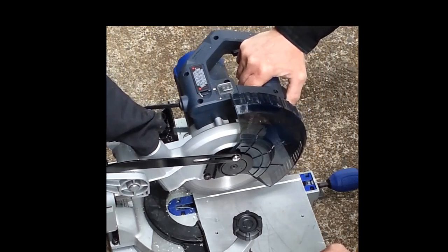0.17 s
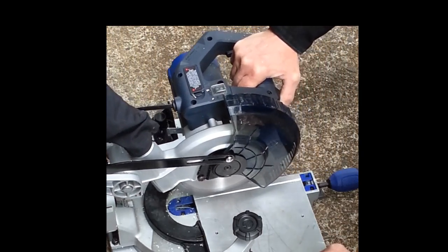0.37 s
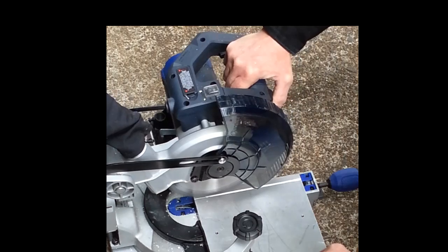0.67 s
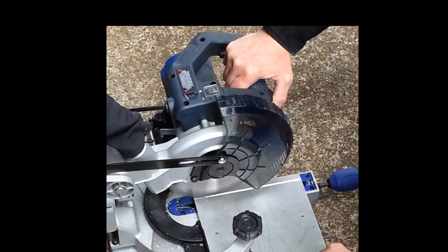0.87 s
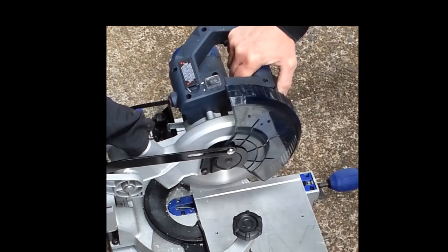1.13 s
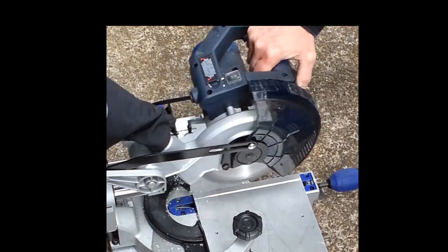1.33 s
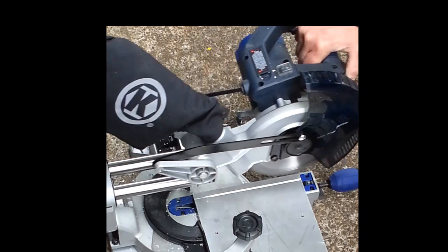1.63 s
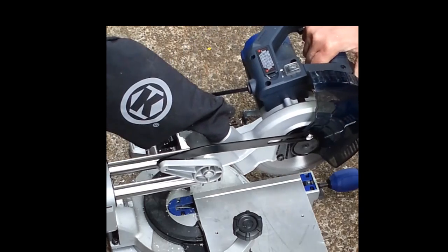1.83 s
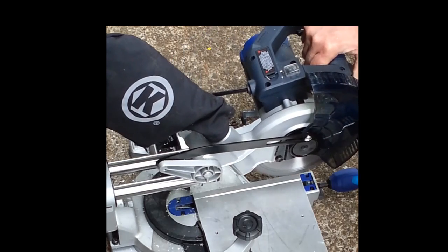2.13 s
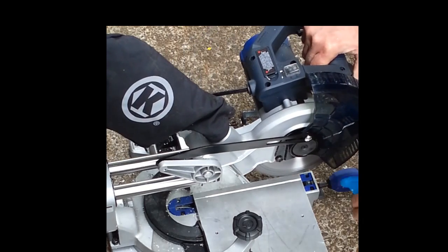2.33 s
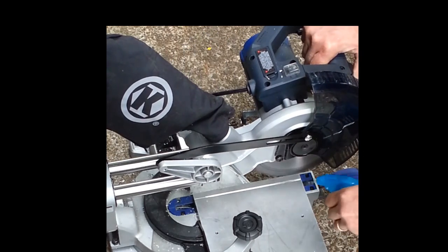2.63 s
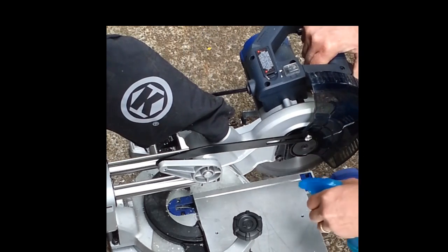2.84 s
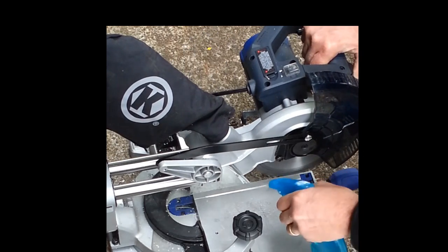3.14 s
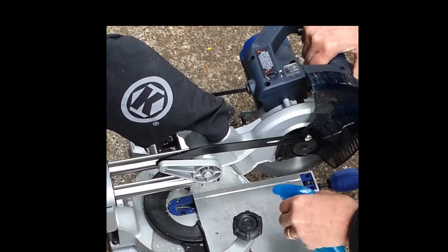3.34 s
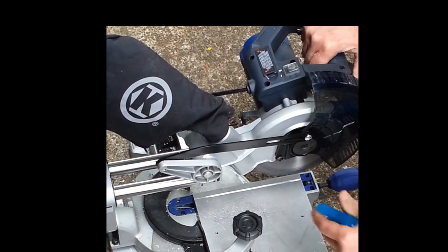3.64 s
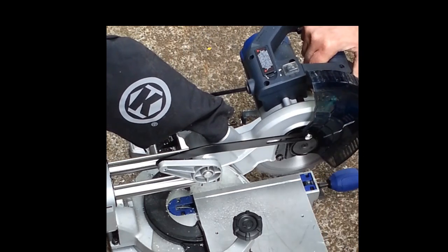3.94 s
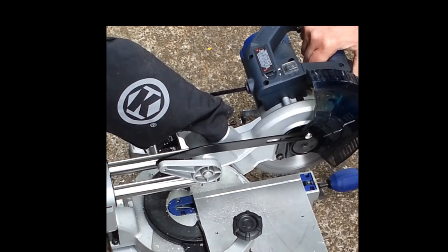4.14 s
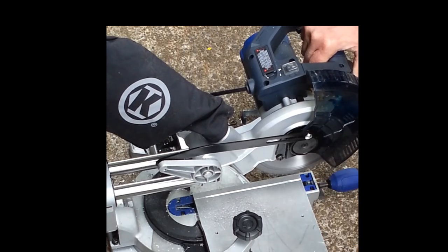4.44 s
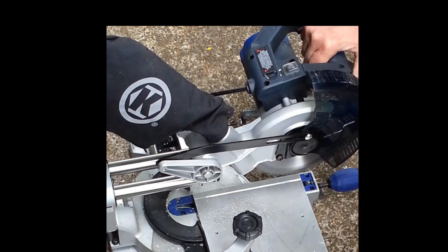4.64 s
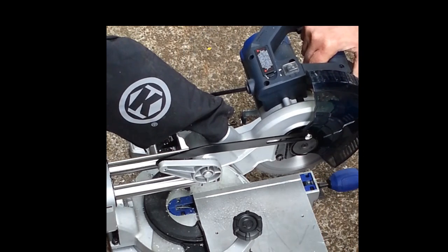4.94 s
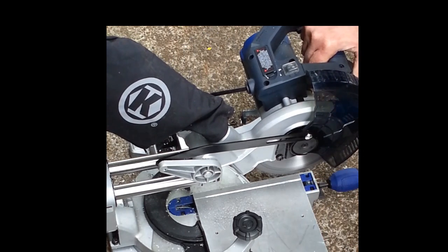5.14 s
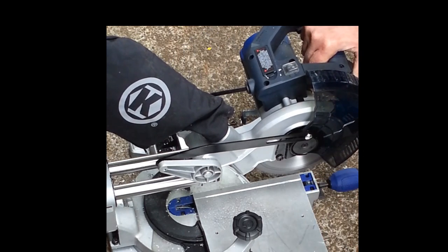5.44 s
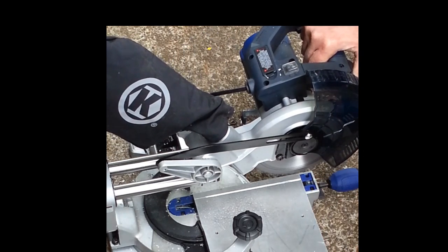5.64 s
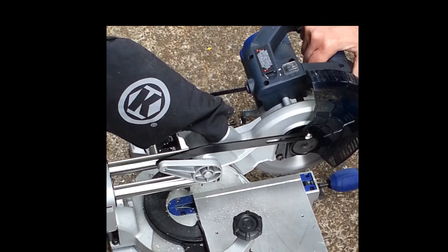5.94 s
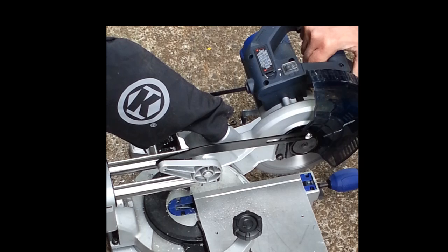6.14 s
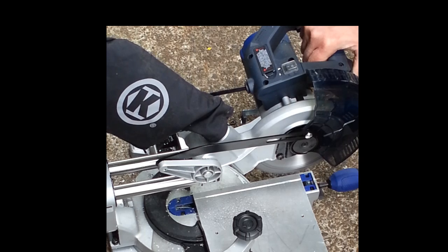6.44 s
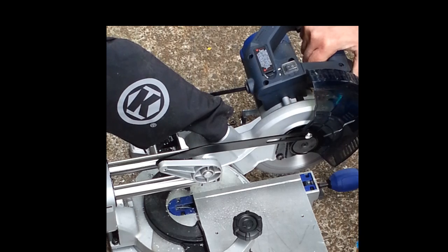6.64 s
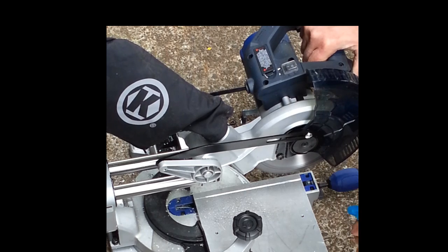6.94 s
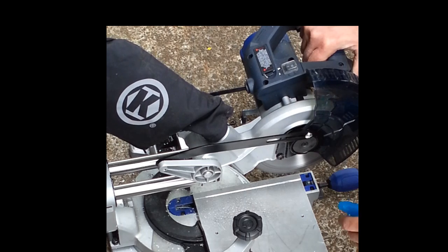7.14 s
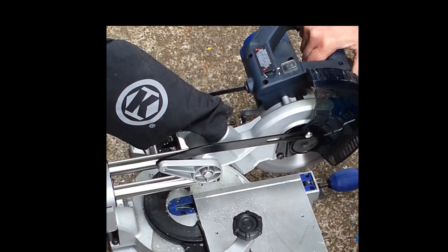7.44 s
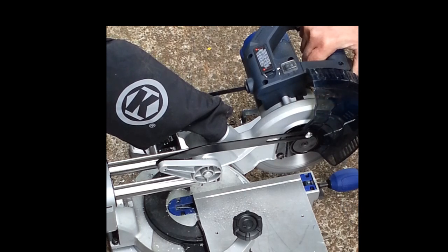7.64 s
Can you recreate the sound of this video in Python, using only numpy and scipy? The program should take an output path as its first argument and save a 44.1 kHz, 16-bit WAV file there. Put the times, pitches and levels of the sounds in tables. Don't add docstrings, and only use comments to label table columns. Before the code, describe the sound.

Close, overloaded power saw shrieks and rings through aluminum plate, breaks free after a second, then whines steadily at idle with fan roar.

```python
import sys
import numpy as np
from scipy import signal
from scipy.io import wavfile
from scipy.ndimage import uniform_filter1d

SR = 44100
rng = np.random.default_rng(int(sys.argv[2]) if len(sys.argv) > 2 else 0)


def store_wav(level_fs):
    pcm = np.round(np.clip(np.atleast_2d(level_fs), -1, 1) * 32767)
    wavfile.write(sys.argv[1], SR, pcm.T.astype(np.int16))


def convert_level_to_amplitude(level_db):
    exponent = np.asarray(level_db, float) / 20
    return 10 ** exponent


N = 343980
TIME = np.arange(N) / SR
GEAR = 7 / 36
LOADED_HZ, IDLE_HZ = 417.8, 443.8
FREED_S = 1.12

# [shaft_order, loaded_left_db, loaded_right_db, idle_left_db, idle_right_db]
SHAFT_TONES = [(1, -39, -44, -29, -26), (2, -18, -18, -23, -17), (3, -32, -35, -38, -50),
               (6, -37, -50, -34, -43), (9, -50, -34, -31, -29), (10, -33, -50, -35, -25),
               (11, -34, -29, -50, -29), (12, -33, -31, -38, -30), (14, -34, -37, -32, -26),
               (18, -50, -50, -38, -37), (28, -48, -37, -49, -39)]
# [blade_order, loaded_left_db, loaded_right_db, idle_left_db, idle_right_db]
BLADE_TONES = [(2, -44, -50, -36, -50), (4, -43, -46, -42, -44), (34, -50, -41, -50, -29),
               (35, -34, -50, -33, -37), (37, -32, -30, -32, -27), (38, -33, -36, -32, -47),
               (39, -50, -35, -34, -44), (70, -50, -50, -36, -37), (71, -50, -50, -32, -31),
               (73, -38, -40, -28, -22), (74, -50, -49, -30, -23), (75, -43, -50, -34, -36),
               (107, -35, -45, -50, -37), (110, -35, -50, -38, -42)]
# [summed_shaft_order, loaded_left_db, loaded_right_db, idle_left_db, idle_right_db]
BEAT_TONES = [(1 + GEAR, -44, -38, -44, -38), (1 + 2 * GEAR, -35, -50, -38, -34),
              (15 + GEAR, -32, -39, -38, -38)]
# [pitch_hz, width_hz, lift_db]
CASE_MODES = [(428, 8, -4), (515, 14, 14), (3880, 50, 5), (4750, 90, 4), (5170, 60, 5), (5275, 50, 7),
              (6050, 60, 5)]
OWN_LEADS = {2: .4, 10: -1.5, 11: -1.4, 12: -1.2, 14: -.7, 34 * GEAR: .2, 37 * GEAR: -2.3, 71 * GEAR: -3.1,
             73 * GEAR: -1.2, 74 * GEAR: -2.2, 75 * GEAR: -.2}


def whine():
    tones = SHAFT_TONES + [(GEAR * order, *levels) for order, *levels in BLADE_TONES] + BEAT_TONES
    port_lag_s = 3 / SR
    unload_hz = 21
    lull_order, lull_s, lull_width_s, lull_db = 73 * GEAR, 5.7, .9, 9
    speed = speed_at(TIME)
    angle = 2 * np.pi * np.cumsum(speed) / SR
    sweep_hz = np.linspace(LOADED_HZ, IDLE_HZ, 50)
    unloaded = np.clip((sweep_hz - LOADED_HZ) / unload_hz, 0, 1)
    climbed = (sweep_hz - LOADED_HZ) / (IDLE_HZ - LOADED_HZ)
    lull = np.exp(-((TIME - lull_s) / lull_width_s) ** 2)
    wavers, slips, swells = (slow(len(tones), rate) for rate in (9., 4., .8))
    out = np.zeros((2, N))
    for (order, *levels), waver, slip, swell in zip(tones, wavers, slips, swells):
        lead = OWN_LEADS.get(order, -2 * np.pi * order * IDLE_HZ * port_lag_s)
        drift_db = 1.5 * waver + 1.5 * swell * (order > 5)
        drift_db = drift_db - lull_db * lull * (order == lull_order)
        looseness = .3 if order >= 1 else 1.1
        phase = order * angle + looseness * slip
        case_db = sum(lift_db / (1 + (2 * (order * sweep_hz - hz) / width) ** 2)
                      for hz, width, lift_db in CASE_MODES)
        for side in range(2):
            loaded_db, idle_db = levels[side], levels[side + 2]
            rise_db = max(idle_db - loaded_db, 0) * unloaded
            fall_db = max(loaded_db - idle_db, 0) * climbed ** 2
            db = np.interp(speed, sweep_hz, loaded_db + rise_db - fall_db + case_db) + drift_db
            out[side] += np.sqrt(2) * convert_level_to_amplitude(db) * np.cos(phase - side * lead)
    return out


def speed_at(t):
    run_up_s, run_up_shape = .6, 1.085
    warm_s, sag_hz_per_s = 5.3, .4
    free_s = np.maximum(t - FREED_S, 0)
    climb = 1 - np.exp(-(free_s / run_up_s) ** run_up_shape)
    return LOADED_HZ + (IDLE_HZ - LOADED_HZ) * climb - sag_hz_per_s * np.maximum(t - warm_s, 0)


# [start_s, bite (0-1)]
CUT = [
    (0, 0.94),
    (.3, 0.82),
    (.6, 0.89),
    (.75, 0.86),
    (.9, 0.88),
    (1.05, 0.82),
    (1.2, 0.82),
    (1.4, 0.43),
    (1.7, 0.2),
    (2.1, 0.1),
]


def bite_at(t):
    return np.clip(column(CUT, 1, t), 0, 1)


# [pitch_hz, width_hz]
RING_MODES = [(742, 33), (1415, 28), (1545, 21), (1948, 51), (2427, 32), (2648, 29), (3246, 28), (3321, 35),
              (3418, 36), (3563, 47), (4387, 33), (4435, 14), (4640, 17), (4683, 160), (4764, 18),
              (5501, 52), (6352, 52), (6567, 44), (6982, 65), (7558, 14), (7601, 58), (7859, 30),
              (7956, 39), (10588, 35), (10965, 29), (11703, 50), (12769, 51), (13183, 75), (13797, 70),
              (14158, 53)]
# [left_db, right_db, left_lead_rad]
RING_LEVELS = [(-30, -25, -0.1), (-24, -27, -1.1), (-31, -27, -0.9), (-25, -26, -0.4), (-39, -26, -1.4),
               (-25, -29, -0.9), (-25, -30, -1.2), (-24, -25, -1.1), (-31, -23, -2.2), (-23, -27, -2.2),
               (-22, -19, -2.6), (-31, -27, -0.4), (-25, -28, -2.0), (-24, -28, -1.8), (-33, -27, -2.0),
               (-42, -30, -2.3), (-30, -31, -2.6), (-20, -24, -2.4), (-27, -32, 2.5), (-35, -34, 2.5),
               (-34, -31, -1.8), (-30, -34, -2.9), (-23, -29, 2.7), (-35, -31, -2.6), (-42, -35, -2.3),
               (-42, -37, -2.9), (-39, -34, -2.3), (-42, -37, 2.4), (-42, -39, -0.7), (-42, -38, 2.7)]


def ring():
    out, live = np.zeros((2, N)), slice(0, round(2.1 * SR))
    t = TIME[live]
    bite = bite_at(t)
    strength = bite ** 1.44
    ease = np.minimum(.86 - bite, .15)
    squeal_db = 40 * ease - 84 * np.maximum(t - FREED_S - .1, 0)
    plate_db = 3 - 3.5 * np.minimum(t, FREED_S)
    swap_db = 6 * (t - .6)
    drifts = zip(slow(len(RING_MODES), 9.), slow(len(RING_MODES), 14.), slow(len(RING_MODES), 9.))
    for (hz, width), (left_db, right_db, lead), (waver, wander, skew) in zip(RING_MODES, RING_LEVELS, drifts):
        phase = 2 * np.pi * np.cumsum(hz + .17 * min(width, 60) * wander[live]) / SR
        db = squeal_db * (6000 < hz < 9500) + plate_db * (4300 < hz < 4800)
        db = db + swap_db * (1900 < hz < 2000) + 2.6 * waver[live]
        out[0, live] += strength * convert_level_to_amplitude(db + left_db) * np.cos(phase)
        out[1, live] += strength * convert_level_to_amplitude(db + right_db) * np.cos(phase - lead + .5 * skew[live])
    return out


# [pitch_hz, left_db per Hz, right_db per Hz]
CHIP_NOISE = [(40, -68, -62), (110, -54, -75), (250, -54.5, -54), (430, -48.5, -48), (810, -34, -39),
              (1160, -37, -39), (2200, -34, -34.5), (4070, -34, -34), (5650, -38.5, -37.5),
              (8500, -39, -40.5), (9700, -42.5, -39.5), (13400, -52, -43.5), (14800, -59, -38),
              (15500, -57, -63)]
# [pitch_hz, left_db per Hz, right_db per Hz]
FAN_NOISE = [(40, -97, -72), (117, -50, -63.5), (253, -56, -58.5), (436, -51.5, -50), (825, -39, -39),
             (1130, -39.5, -44.5), (2220, -42.5, -42.5), (4040, -40.5, -39.5), (5800, -48, -45),
             (8500, -47, -47), (9670, -51, -50), (13300, -63.5, -50.5), (14300, -66, -59),
             (15700, -47, -50)]
# [pitch_hz, width_hz, lift_db]
PLATE_MODES = [(1180, 46, 9), (2410, 85, 2), (4600, 160, -0.5), (8000, 250, 5), (8700, 200, 4.5),
               (10740, 440, 5.5), (12100, 440, 6.5), (14300, 700, 5)]
# [pitch_hz, width_hz, left_lift_db, right_lift_db]
HOUSING_MODES = [(486, 33, 7.5, 8), (527, 30, -2.5, -11), (628, 39, 2.5, 10), (686, 32, 5, -13),
                 (740, 19, -4, 0), (822, 24, 2.5, 5), (1080, 45, -7.5, -3), (1390, 118, -6.5, -4),
                 (1423, 23, 8, 10), (1686, 33, 4, 10.5), (1850, 65, 6, 4.5), (2024, 45, 3, 8),
                 (2096, 32, 6.5, 6.5), (2314, 81, 6, 6), (2420, 31, 8, 8), (3410, 190, -3, -2.5),
                 (3700, 47, -3, 0), (4126, 26, 7, 6), (4670, 140, 3, 1), (6440, 380, 6.5, 1),
                 (8000, 370, 0.5, -0.5), (12400, 450, 9, -0.5)]
# [pitch_hz, left-right likeness (0-1), left_lead_rad]
PORTS = [(150, 0, 1.6), (460, 0.79, -0.2), (860, 0.89, 0.1), (1200, 0.64, -1.5), (1510, 0.47, -1.5),
         (2100, 0.75, -1.5), (2820, 0, -1.5), (3850, 0.8, -2), (5100, 0.16, -2), (6300, 0.32, -2.5),
         (8500, 0.23, -3), (9400, 0.5, -5), (10700, 0, 12), (14000, 0, -5)]


def roar():
    s, hz, z, stray = noise_fields(size=2048)
    bite = bite_at(s)
    leaving = bite * (1 - bite)

    patches = uniform_filter1d(uniform_filter1d(rng.standard_normal(z.shape), 30, 0), 8, 1)
    gusts = uniform_filter1d(rng.standard_normal(len(s)), 4)
    db = 0.71 * patches / patches.std()
    db += np.outer(np.clip(hz / 14000, 0, 1), 0.68 * gusts / gusts.std())
    db += 0.87 - 8 * bite

    boom_db = 1.5 * bite + 21.5 * leaving - 0.32 * s
    db += np.outer(1 / (1 + (hz / 1000) ** 6), boom_db)

    wander, waver = (np.interp(s, TIME, drift) for drift in slow(2, 2.))
    gullet_hz = 9.2 * speed_at(s) + 30 * wander
    gullet_db = 2.5 - 2.5 * bite + 13 * leaving + 1.8 * waver / 2
    db += gullet_db / (1 + (2 * (hz[:, None] - gullet_hz) / 320) ** 2)

    plate_db = sum(lift_db / (1 + (2 * (hz - f) / width) ** 2) for f, width, lift_db in PLATE_MODES)
    db += np.outer(plate_db, bite)

    same = np.clip(over_hz(PORTS, 1, hz), 0, 1)[:, None]
    turned = z * np.exp(-1j * over_hz(PORTS, 2, hz))[:, None]
    right = same * turned + np.sqrt(1 - same ** 2) * stray

    housing_db = sum(np.outer(lifts_db, 1 / (1 + (2 * (hz - f) / width) ** 2))
                     for f, width, *lifts_db in HOUSING_MODES)
    housed = 1 - np.outer(hz > 1250, .8 * bite)
    colour_db = [np.outer(over_hz(CHIP_NOISE, k, hz), bite) + np.outer(over_hz(FAN_NOISE, k, hz), 1 - bite)
                 for k in (1, 2)]
    field = np.array([z, right]) * convert_level_to_amplitude(db + colour_db + housing_db[:, :, None] * housed) / 2
    return signal.istft(field, nperseg=2048, noverlap=1536)[1][:, :N]


def hum():
    hum_hz, level_db = 119.9, np.array([[-44], [-55]])
    waver, slip = slow(2, 4.)
    return np.sqrt(2) * convert_level_to_amplitude(level_db + 2.5 * waver) * np.cos(2 * np.pi * hum_hz * TIME + slip)


def slow(count, per_s):
    knots = rng.standard_normal((count, int(N / SR * 60) + 2))
    smoother = signal.butter(2, min(per_s, 25) / 30, output="sos")
    knots = signal.sosfiltfilt(smoother, knots, axis=1)
    knots /= knots.std(1, keepdims=True)
    return [np.interp(TIME * 60, np.arange(len(row)), row) for row in knots]


def noise_fields(size):
    hop = size // 4
    a, b, c, d = rng.standard_normal((N // hop + 5, size // 2 + 1, 4)).T
    scale = np.sqrt(3 * SR / size / 2)
    times = np.arange(a.shape[1]) * hop / SR
    return times, np.fft.rfftfreq(size, 1 / SR), scale * (a + 1j * b), scale * (c + 1j * d)


def column(rows, index, at):
    rows = np.array(rows, float)
    return np.interp(at, rows[:, 0], rows[:, index])


def over_hz(rows, index, hz):
    rows = np.array(rows, float)
    return np.interp(np.log(hz + 1), np.log(rows[:, 0] + 1), rows[:, index])


def scene():
    motor_db, ring_db, roar_db = 1.3, 5., 2.5
    return convert_level_to_amplitude(motor_db) * (whine() + hum()) + convert_level_to_amplitude(ring_db) * ring() + convert_level_to_amplitude(roar_db) * roar()


# [pitch_hz, cutting_drop_db, idle_drop_db]
TREBLE_STEPS = [(9600, 5, 5), (9750, -2.5, -2.5), (13800, 2, 2), (14830, 11, 2.5)]


def starved_treble(x):
    hz, s, z = signal.stft(x, SR, nperseg=1024)
    bite = bite_at(s)
    db = -sum(np.outer(hz > f, idle_db + bite * (cutting_db - idle_db))
              for f, cutting_db, idle_db in TREBLE_STEPS)
    edge_hz = 16200 - 800 * rng.exponential(1, (2, 1, len(s)))
    blocks = rng.random((2, len(hz) // 4 + 1, len(s) // 3 + 1))
    blocks = blocks.repeat(4, 1).repeat(3, 2)[:, :len(hz), :len(s)]
    hole_chance = .07 * np.clip((hz[:, None] - 3000) / 6000, 0, 1)
    hole_chance = hole_chance + .25 * (hz[:, None] > TREBLE_STEPS[-1][0])
    db = db - 9 * (hz[:, None] > edge_hz) - 12 * (blocks < hole_chance)
    return signal.istft(z * convert_level_to_amplitude(db), SR, nperseg=1024)[1][:, :N]


def roll_off(x):
    return signal.sosfilt(signal.butter(12, 15760, fs=SR, output="sos"), x)


def record(dry):
    ceiling = 1.35
    flattened = dry / (1 + abs(dry / ceiling) ** 4) ** 0.38
    mix = starved_treble(flattened)
    return roll_off(mix)


dry = scene()
out = record(dry)
store_wav(out)
```